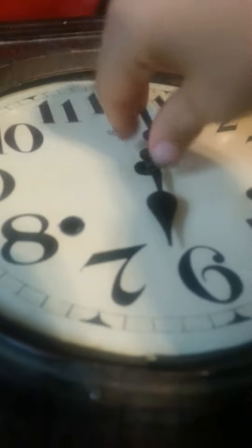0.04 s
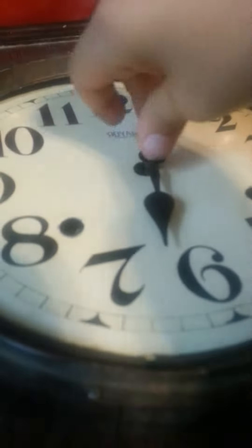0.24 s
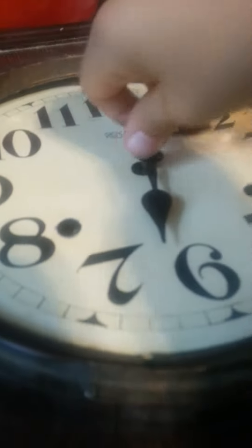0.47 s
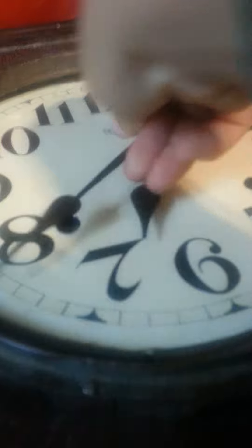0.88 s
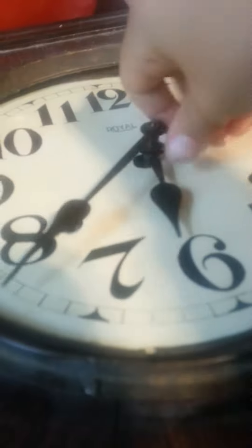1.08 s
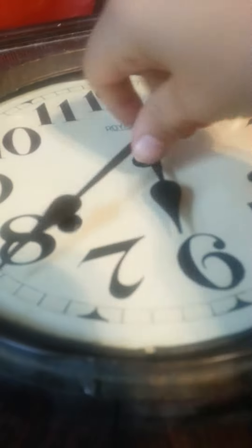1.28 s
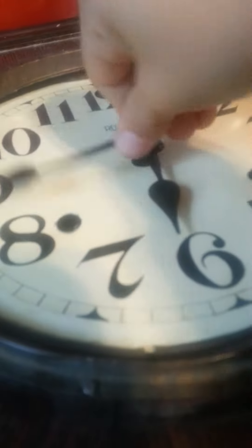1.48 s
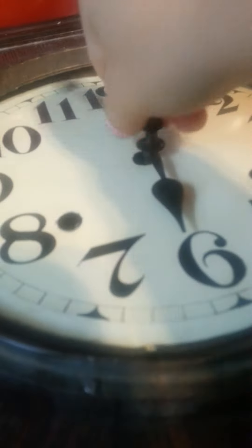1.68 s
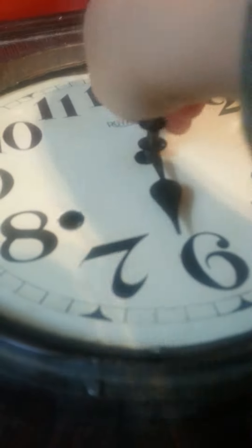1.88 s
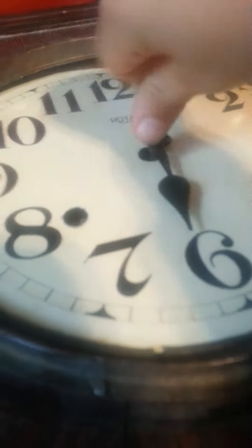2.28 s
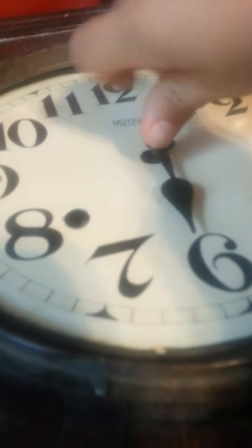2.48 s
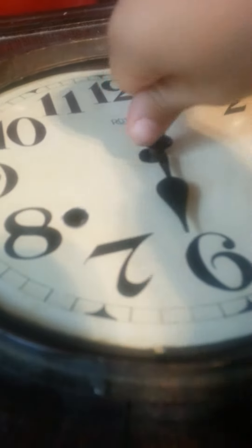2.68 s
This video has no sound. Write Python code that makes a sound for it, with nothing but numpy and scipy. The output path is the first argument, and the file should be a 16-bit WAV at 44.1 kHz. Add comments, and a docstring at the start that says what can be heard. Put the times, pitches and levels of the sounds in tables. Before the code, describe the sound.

Metal clock hands click and rattle as fingers turn them, with soft knocks on wood.

```python
"""Setting a wooden clock

Fingers push the hands of a wooden-cased clock round, close by in a quiet room. The loose metal hands
click and chatter on their shaft and shake the dial; one briefly sings, and gear teeth tick lightly.
The fingers rub and squeak on the dial and knock the case. During one long turn the friction clutch
(the grip that lets the hands slip round) creaks as it sticks and slips."""
import sys
import numpy as np
from scipy import signal
from scipy.io import wavfile
from scipy.ndimage import uniform_filter1d

SR = 44100
rng = np.random.default_rng(int(sys.argv[2]) if len(sys.argv) > 2 else 0)


def put_to_file(sound):
    """Save the sound as 16-bit audio at rate SR, in the file named by the first command-line argument."""
    columns = np.atleast_2d(sound).T  # one column per channel
    safe = np.clip(columns, -1, 1)
    whole_steps = np.round(safe * 32767)
    wavfile.write(sys.argv[1], SR, whole_steps.astype(np.int16))


N = 125685
TIME = np.arange(N) / SR

# Levels are relative. "Side" is left minus right. "Ring time" is the time to fade by 60 dB.
# Tone colours of the room, skin, slipping clutch, dial and hands: (frequency [Hz], level [dB])
ROOM_COLOUR = [(30, -29), (65, -18.5), (105, 0.5), (420, -10.5), (700, -22.5), (1600, -17), (6200, -17.5),
               (14500, -19.5)]
SKIN_COLOUR = [(30, -16), (70, -14), (110, 3.5), (200, 5), (480, 2), (750, -5), (1200, -12), (3000, -28),
               (12000, -28.5)]
SLIP_COLOUR = [(200, -59), (1200, -4.5), (2000, -6.5), (2750, -0.5), (3500, -11), (4800, -2), (6000, -4.5),
               (7100, -2), (8500, -15), (13000, -26)]
DIAL_COLOUR = [(100, -26.5), (400, -19.5), (780, -2.5), (950, -1), (1170, 5.5), (1400, -6.5), (1650, 1.5),
               (1950, -2.5), (2500, -4), (3200, -11.5), (14000, -29.5)]
METAL_COLOUR = [(500, -61), (2000, -37), (3100, -12.5), (4100, -1), (5000, -6), (6500, -2), (9200, -5),
                (11000, -13.5), (13000, -20.5), (14500, -31)]
# How long the room echoes: (frequency [Hz], ring time [s])
ROOM_RING_TIMES = [(150, 0.042), (400, 0.16), (1000, 0.08), (2800, 0.1), (7300, 0.11), (14000, 0.077)]
# Fingers rub over the dial: (time [s], level [dB])
RUB_LEVELS = [(.1, -72.5), (.3, -57), (.36, -51.5), (0.496, -43), (.62, -69.5), (.8, -51.5), (1.053, -45),
              (1.159, -62), (1.5, -63.5), (1.679, -66.5), (1.76, -42.5), (1.85, -47), (2.48, -48),
              (2.65, -52.5), (2.75, -67)]
# A fingertip squeaks: (time [s], length [s], level [dB], pitch [Hz], glide [Hz/s])
FINGER_SQUEAKS = [(0.684, .042, -50, 1260, -800), (2.665, .016, -42, 1150, -18000)]
# Knocks on the case: (time [s], level [dB], pitch that the spot favours [Hz])
CASE_KNOCKS = [(0.001, -46, 292), (0.157, -60.5, 380), (0.235, -39, 230), (0.343, -44, 152),
               (0.780, -35.5, 350), (0.806, -34.5, 238), (0.843, -34.5, 580), (0.912, -53, 384),
               (0.975, -38.5, 390), (0.993, -35, 195), (1.023, -43.5, 305), (1.074, -41, 336),
               (1.228, -40, 284), (1.297, -33, 190), (1.423, -51, 628), (1.569, -49.5, 177),
               (1.736, -37, 215), (1.743, -32, 170), (1.785, -33.5, 126), (1.852, -44.5, 350),
               (1.913, -37, 224), (2.004, -47.5, 470), (2.036, -36.5, 204), (2.079, -42, 503),
               (2.173, -35.5, 520), (2.323, -35, 440), (2.341, -34.5, 220), (2.43, -39, 275),
               (2.455, -39.5, 329), (2.594, -36, 297), (2.825, -55, 223.5)]
# The notes the wooden case rings at: (pitch [Hz], level [dB], ring time [s])
CASE_NOTES = [(98, -9.5, 0.3), (141, -2, 0.074), (162, -3, 0.15), (213, 2.5, 0.13), (416.3, 0, 0.056),
              (310.8, -8, 0.2), (378, -4, 0.14), (475.5, 2, 0.12), (530, 1, 0.025), (583.7, 3.5, 0.043),
              (773, -10.5, 0.055)]
# The course of the clutch's creak: (time [s], level [dB], ringing pitch [Hz])
CREAK_PATH = [(1.84, -63, 5800), (1.882, -40.5, 5860), (1.955, -39, 5540), (2.02, -46, 5520),
              (2.159, -44, 5870), (2.22, -51.5, 5600), (2.3, -57, 6000)]
# Gear teeth tick: (time [s], level [dB], pitch [Hz])
TOOTH_TICKS = [(1.1905, -26.5, 6700), (1.2335, -27.5, 6700), (1.3326, -28, 7000), (1.6138, -33, 5930),
               (2.267, -34, 6200)]
# The notes the metal hands ring at: (pitch [Hz], level [dB])
HAND_NOTES = [(4459, -14), (5337, -4), (5630, 11.5), (6140, -3), (6771, -7.5), (7135, 5), (7650, 4.5),
              (8258, 1.5), (9200, -3.5)]
# A hand chatters along its seat: (time [s], rise [s], hold [s], fade [s], metal level [dB],
# dial level [dB], side [dB], brightest frequency [Hz])
HAND_CHATTERS = [(0.352, 0.022, 0.022, 0.016, -30.5, -34, -15, 7150),
                 (0.439, 0.015, 0.019, 0.017, -21.5, -32.5, -5.5, 6800),
                 (0.472, 0.0081, 0.013, 0.012, -29.5, -52.5, -11.5, 8400),
                 (0.86, 0.013, 0.022, 0.032, -47, -75, -10.5, 7300),
                 (2.429, 0.0088, 0.0057, 0.011, -35.5, -56, 3, 6200)]
# The hands click: (time [s], metal level [dB], dial level [dB], fade [s], side [dB],
# brightest frequency [Hz])
HAND_CLICKS = [(0.001, -35, -41.5, 0.0098, 1, 5860), (0.147, -54.5, -56, 0.017, 0, 5560),
               (0.233, -22.5, -30.5, 0.0099, -3.5, 8500), (0.3378, -14.5, -34, 0.017, -3.5, 8750),
               (0.366, -26, -49, 0.019, 8.5, 5700), (0.54, -42.5, -40, 0.0051, 3, 6300),
               (0.609, -41.5, -56.5, 0.0083, 3.5, 5000), (0.7332, -40, -48, 0.019, 0, 3850),
               (0.801, -29, -38, 0.011, 4, 5850), (0.840, -25, -31, 0.012, -0.5, 6050),
               (0.980, -38.5, -36.5, 0.017, 1, 5730), (1.01, -47.5, -57, 0.019, -12, 7800),
               (1.069, -57, -47, 0.013, -13, 7140), (1.224, -41, -31, 0.0035, 24.5, 5960),
               (1.2894, -20, -26.5, 0.012, 1.5, 6480), (1.419, -75.5, -53.5, 0.0076, 10.5, 5000),
               (1.576, -76, -50.5, 0.026, 11, 5030), (1.611, -39, -49, 0.0085, -2.5, 6570),
               (1.719, -48.5, -44.5, 0.01, 0, 5820), (1.7749, -15, -30.5, 0.0028, -1.5, 5730),
               (1.908, -22, -33, 0.014, -2.5, 4930), (1.917, -19, -29.5, 0.0068, -15, 7240),
               (2.034, -35, -30, 0.003, -7, 4070), (2.169, -21.5, -24.5, 0.0081, -5, 6130),
               (2.307, -32.5, -36.5, 0.0091, 1, 4250), (2.318, -26, -29.5, 0.0057, 0.5, 7100),
               (2.3338, -13.5, -22, 0.0017, 5.5, 5570), (2.4221, -19.5, -30, 0.022, -11, 7300),
               (2.448, -23.5, -37.5, 0.015, -0.5, 5600), (2.495, -32, -40, 0.016, -10.5, 6500),
               (2.532, -33.5, -44, 0.01, 0.5, 6530), (2.59, -13, -20.5, 0.0029, 3.5, 6000)]

LIKENESS = 0.15  # how alike left and right are: 0 is unrelated, 1 is the same
METAL_ECHO_DB, DIAL_ECHO_DB = -11.5, 0


def amp(db):
    """Turns decibels into a gain to multiply by."""
    return 10 ** (np.asarray(db) / 20)


def unit(x):
    """Scales each channel to an energy of one."""
    return x / np.sqrt(np.sum(x ** 2, -1, keepdims=True) + 1e-20)


def read(points, hz):
    """Reads between the rows of a table, with frequency spaced in octaves."""
    row_hz, value = np.transpose(points)
    return np.interp(np.log(hz + 1), np.log(row_hz), value)


def add(mix, start_s, sound):
    """Mixes a stereo sound in at a given time."""
    part = mix[:, max(round(start_s * SR), 0):][:, :sound.shape[1]]
    part += sound[:, :part.shape[1]]


def pan(db):
    """Left and right gains; positive decibels lean left."""
    return amp(np.array([[db / 2], [-db / 2]]))


def through(x, response):
    """Passes a sound through an object, given the object's response to one sharp tap."""
    return signal.fftconvolve(np.atleast_2d(x), np.atleast_2d(response), axes=1)[:, :x.shape[-1]]


def bump(hz, centre_hz, octaves):
    """A smooth hill of height one around a frequency."""
    return np.exp(-(np.log2(hz / centre_hz) / octaves) ** 2)


def colour(points, bright_hz=None):
    """The tap response of a tone colour, lifted around bright_hz if that is given."""
    hz = abs(np.fft.fftfreq(2048, 1 / SR))
    db = read(points, hz)
    if bright_hz:
        db = db + 9.5 * bump(hz + 1, bright_hz, octaves=0.23)
    spectrum = np.exp(np.conj(signal.hilbert(np.log(amp(db)))))  # nothing sounds before the tap
    return unit(np.fft.ifft(spectrum).real)


def noise(size, likeness=LIKENESS):
    """Two partly alike channels of white noise."""
    left, other = rng.standard_normal((2, size))
    return np.array([left, likeness * left + np.sqrt(1 - likeness ** 2) * other])


def burst(t, fade_s, likeness=LIKENESS):
    """A puff of noise that dies away."""
    return noise(len(t), likeness) * np.exp(-t / fade_s)


def impacts(envelope, per_s):
    """Tiny random hits of uneven size that follow an envelope (a loudness curve)."""
    size = len(envelope)
    hits = rng.random(size) < per_s / SR
    strength = amp(2.5 * np.minimum(rng.exponential(1, size), 3))
    return unit(noise(size, likeness=0.8) * hits * strength * envelope) * np.linalg.norm(envelope)


def scatter(x, fade_s, likeness=LIKENESS):
    """A blow runs to and fro inside a part, which briefly smears it."""
    return through(x, unit(burst(TIME[:SR // 50], fade_s, likeness)))


def room(x, echo_db):
    """Adds the short, blurred echo of a small room."""
    hz, t, spectrum = signal.stft(rng.standard_normal((2, SR // 2)), SR, nperseg=256)
    fade = amp(-60 * t / read(ROOM_RING_TIMES, hz)[:, None])
    rise = np.minimum(t / 0.002, 1)
    tail = signal.istft(spectrum * fade * rise, SR, nperseg=256)[1]
    return x + amp(echo_db) * through(x, unit(tail))


def room_tone():
    """The faint, steady hush of the room."""
    return amp(-67) * through(rng.standard_normal((2, N)), colour(ROOM_COLOUR))


def finger_rubs():
    """Skin drags over the dial in dull, grainy rubs."""
    times, db = np.transpose(RUB_LEVELS)
    grains = impacts(np.ones(N), per_s=5000) * amp(np.interp(TIME, times, db))
    return through(grains, colour(SKIN_COLOUR)) * pan(db=2)


def finger_squeaks():
    """Skin slips on the dial in a brief, rough tone that sags in pitch."""
    out = np.zeros((2, N))
    for start, length, db, hz, glide in FINGER_SQUEAKS:
        t = TIME[:round(length * SR)]
        wobble = 500 * uniform_filter1d(rng.standard_normal(len(t)), 20)
        tone = np.sin(2 * np.pi * np.cumsum(hz + glide * t + wobble) / SR)
        rasp = through(noise(len(t)), colour(DIAL_COLOUR))
        swell = np.sin(np.pi * t / length)
        add(out, start, amp(db) * pan(db=4) * swell * (tone + amp(-12) * rasp))
    return room(out, DIAL_ECHO_DB)


def case_knocks(detune=0.035, contact_s=0.000037):
    """Each soft push thuds and rings the wooden case, whose notes shift under the fingers."""
    out, t = np.zeros((2, N)), TIME[:SR // 4]
    push = t * np.exp(-t / contact_s)
    for start, db, spot_hz in CASE_KNOCKS:
        ring = np.zeros(len(t))
        for hz, note_db, ring_s in CASE_NOTES:
            favour_db = 7.5 * bump(hz, spot_hz, octaves=0.44)
            shifted_hz = hz * (1 + detune * rng.standard_normal())
            wave = rng.choice([-1, 1]) * np.cos(2 * np.pi * shifted_hz * t)
            ring += amp(note_db + favour_db - 60 * t / ring_s) * wave
        thud = through(burst(t, fade_s=0.014, likeness=0.58), colour(SKIN_COLOUR))
        knock = through(unit(ring) + amp(-8) * unit(thud), push)
        add(out, start, amp(db) * unit(knock) * np.sqrt(0.031 * SR))
    return room(out * pan(db=3.5), echo_db=-8)


def clutch_creak(slips_per_s=240, width_hz=450):
    """The clutch sticks and slips: an uneven run of scrapes rings the metal at a drifting pitch."""
    times, db, hz = np.transpose(CREAK_PATH)
    scrapes, t = np.zeros((2, N)), TIME[:SR // 100]
    gap_luck, size_luck = rng.standard_normal((120, 2)).T
    starts = times[0] + np.cumsum(np.exp(0.14 * gap_luck)) / slips_per_s
    for start, size in zip(starts, amp(6.9 * size_luck)):
        slip = unit(burst(t, fade_s=0.0021, likeness=0.23))
        add(scrapes, start, size * slip * np.sqrt(SR / slips_per_s))
    scrapes *= amp(np.interp(TIME, times, db)) * (TIME < times[-1])
    # Shift the drifting pitch down to 0 Hz, smooth, and shift back: only sound near it is left.
    shift = np.exp(2j * np.pi * np.cumsum(np.interp(TIME, times, hz)) / SR)
    smoothing = unit(t * np.exp(-np.pi * width_hz * t))
    squeal = np.sqrt(2) * (shift * through(scrapes / shift, smoothing)).real
    rasp = through(scrapes, colour(SLIP_COLOUR))
    return room(amp(-8.5) * (squeal * pan(db=6) + rasp * pan(db=2.5)), echo_db=1.5)


def gear_ticks(fade_s=0.00055):
    """A gear tooth drops into place with a snap and a few cycles of ringing."""
    out, t = np.zeros((2, N)), TIME[:SR // 100]
    for start, db, hz in TOOTH_TICKS:
        snap = through(burst(t, fade_s), colour(METAL_COLOUR))
        envelope = t / fade_s * np.exp(1 - t / fade_s)
        ring = envelope * np.sin(2 * np.pi * hz * t)
        add(out, start, amp(db) * (ring + amp(-5) * snap))
    return room(out, echo_db=-20)


def singing_hand(start_s=0.444, length_s=0.042, pitch_hz=6790):
    """Friction keeps one note of a dragged hand sounding, in a brief, fluttering tone."""
    out, t = np.zeros((2, N)), TIME[:round(length_s * SR)]
    flutter = 1 + 0.5 * through(rng.standard_normal(len(t)), unit(np.hanning(SR // 300)))
    swell = np.sin(np.pi * t / length_s)
    tone = np.sin(2 * np.pi * (pitch_hz * t + rng.random((2, 1))))
    add(out, start_s, amp(-23.5) * pan(db=-12) * swell * flutter * tone)
    return room(out, METAL_ECHO_DB)


def loose_hands(click_hits_per_s=7000, chatter_hits_per_s=2000, ring_s=0.075, gripped_at_s=0.7):
    """Showers of tiny hits rattle the hands and shake the dial; the hands ring on until gripped."""
    metal, dial, t = np.zeros((2, N)), np.zeros((2, N)), TIME[:SR // 6]
    showers = []
    for start, metal_db, dial_db, fade, side_db, bright_hz in HAND_CLICKS:
        envelope = np.minimum(t / 0.00098, 1) * np.exp(-t / fade)
        showers.append((start, envelope, click_hits_per_s, metal_db, dial_db, side_db, bright_hz))
    for start, rise, hold, fade, metal_db, dial_db, side_db, bright_hz in HAND_CHATTERS:
        envelope = np.minimum(t / rise, 1) * np.exp(-np.maximum(t - rise - hold, 0) / fade)
        showers.append((start, envelope, chatter_hits_per_s, metal_db, dial_db, side_db, bright_hz))
    for start, envelope, per_s, metal_db, dial_db, side_db, bright_hz in showers:
        metal_hits = scatter(impacts(envelope, per_s), fade_s=0.0011)
        clink = through(metal_hits, colour(METAL_COLOUR, bright_hz))
        add(metal, start, amp(metal_db) * pan(side_db) * clink)
        dial_hits = scatter(impacts(envelope, per_s), fade_s=0.0012, likeness=-0.3)
        add(dial, start, amp(dial_db) * pan(db=2) * dial_hits)
    notes = sum(amp(db) * np.sin(2 * np.pi * (hz * t + rng.random((2, 1)))) for hz, db in HAND_NOTES)
    ring = unit(notes * amp(-60 * t / ring_s))
    metal += amp(-15) * through(metal * (TIME < gripped_at_s), ring)
    dial = through(dial, colour(DIAL_COLOUR))
    return room(metal, METAL_ECHO_DB) + room(dial, DIAL_ECHO_DB)


def scene():
    """The clock and the fingers over the hush of the room."""
    hush = room_tone()
    clock = loose_hands() + singing_hand() + gear_ticks() + case_knocks() + clutch_creak()
    return hush + clock + finger_rubs() + finger_squeaks()


def record(dry, low_hz=22, high_hz=14700):
    """Trims away the deepest bass and the highest treble."""
    thinned = signal.lfilter(*signal.butter(1, low_hz, "high", fs=SR), dry)
    treble_cut = signal.firwin(255, high_hz, window=("kaiser", 8), fs=SR)
    return signal.oaconvolve(thinned, treble_cut[None], "same")


dry = scene()
out = record(dry)
put_to_file(out)
```